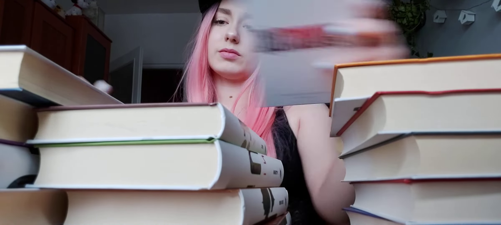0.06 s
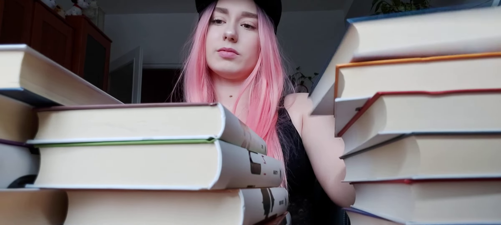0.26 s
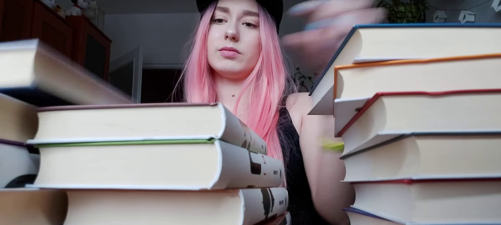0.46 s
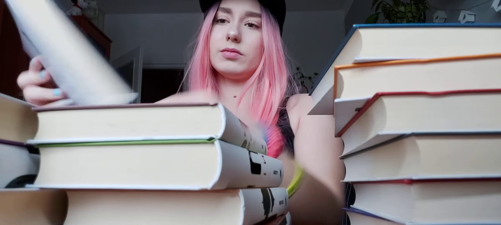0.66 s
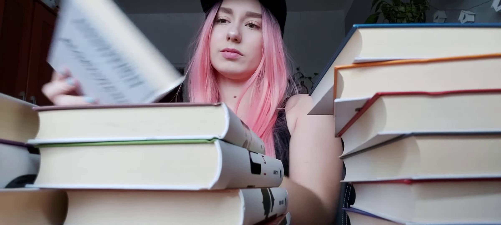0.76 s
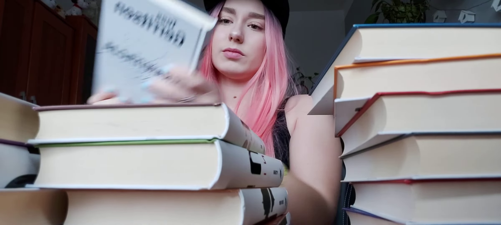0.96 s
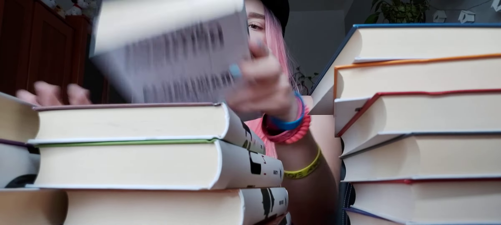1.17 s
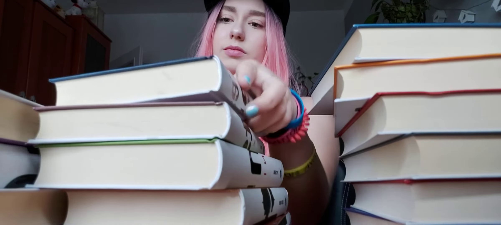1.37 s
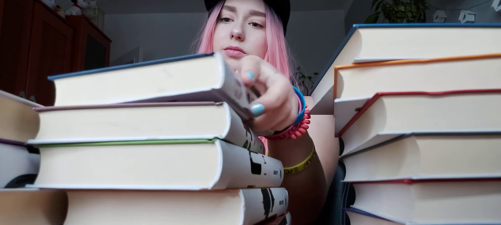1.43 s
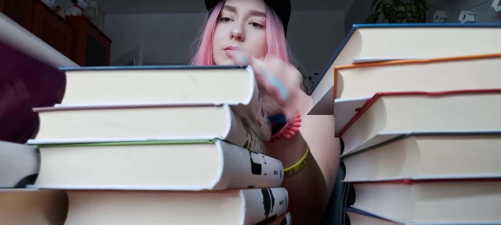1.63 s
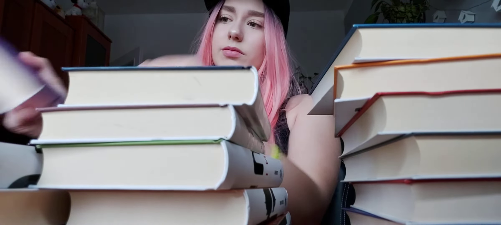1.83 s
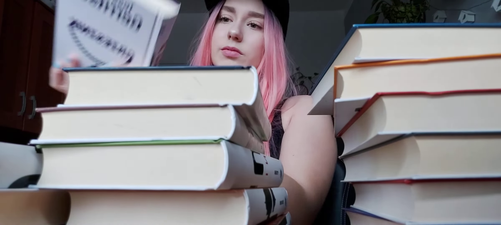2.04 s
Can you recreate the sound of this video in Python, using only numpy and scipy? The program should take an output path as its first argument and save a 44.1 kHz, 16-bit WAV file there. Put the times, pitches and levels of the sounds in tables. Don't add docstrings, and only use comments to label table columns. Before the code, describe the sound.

Hardcover books thump heavily onto a stack on a wooden table, with soft cover slides between

```python
import sys
import numpy as np
from scipy import signal
from scipy.io import wavfile

SR = 44100
rng = np.random.default_rng(int(sys.argv[2]) if len(sys.argv) > 2 else 0)


def boost_factor(decibels):
    exponent = np.asarray(decibels, float) / 20
    return 10 ** exponent


def master(y):
    cut = np.clip(np.atleast_2d(y).T, -1, 1)
    pcm = np.round(cut * 32767)
    wavfile.write(sys.argv[1], SR, pcm.astype(np.int16))


N = 92610


def rms_one(x):
    return x / np.sqrt(np.mean(x ** 2) + 1e-20)


def drift(rate_hz):
    r = np.exp(-80 * np.pi * rate_hz / SR)
    chance = rng.standard_normal(N // 40 + 2002)
    slow = signal.lfilter([1], [1, -2 * r, r * r], chance)[2000:]
    return np.interp(np.arange(N) / 40, np.arange(len(slow)), rms_one(slow))


def sides(pan_db):
    return boost_factor(np.array([pan_db, -np.asarray(pan_db)]) / 2)


def butter(x, order, hz, kind):
    return signal.sosfilt(signal.butter(order, hz, kind, fs=SR, output="sos"), x)


def strike(s, db, pan_db, modes, soft_hz, apart=0, scatter_db=4):
    out = 0
    at = (np.asarray(s) * SR).astype(int)
    luck = rng.standard_normal((len(at), len(modes), 2))
    for k, (hz, mode_db, t60) in enumerate(modes):
        clicks = np.full((2, N), 1e-18)
        gains = sides(pan_db + 0 * at) * boost_factor(db + mode_db + scatter_db * luck[:, k, 0])
        late = (apart * luck[:, k, 1] * SR / hz).astype(int)
        clicks[0, at] = gains[0]
        clicks[1, at + late] = gains[1]
        r = boost_factor(-60 / (t60 * SR))
        w = 2 * np.pi * hz / SR
        out = out + signal.lfilter([0, np.sin(w)], [1, -2 * r * np.cos(w), r * r], clicks)
    p = np.exp(-2 * np.pi * soft_hz / SR)
    return signal.lfilter([(1 - p) ** 2], [1, -2 * p, p * p], out)


def dying_noise(s, db, pan_db, t60, band_hz, alike):
    clicks = np.full((2, N), 1e-18)
    clicks[:, (s * SR).astype(int)] = sides(pan_db) * boost_factor(db)
    envelope = signal.lfilter([1], [1, -boost_factor(-60 / (t60 * SR))], clicks)
    shared, *own = rng.standard_normal((3, N))
    noise = alike * shared + np.sqrt(1 - alike ** 2) * np.array(own)
    return butter(envelope * noise, 1, band_hz, "band")


def coloured(spectrum, alike, patchy_db):
    out = 0
    white = rng.standard_normal((2, 2, N))
    hz, density_db = np.transpose(spectrum)
    bounds = np.geomspace(hz[0], hz[-1], int(2 * np.log2(hz[-1] / hz[0])) + 2)
    for k, (low, high) in enumerate(zip(bounds, bounds[1:])):
        mid, side = butter(white[k % 2], 2, [low, high], "band")
        band_db = np.interp(np.log(low * high) / 2, np.log(hz), density_db)
        stereo = np.sqrt(1 + alike) * mid + np.sqrt(1 - alike) * side * [[1], [-1]]
        out = out + boost_factor(band_db + patchy_db * drift(27)) * stereo
    return rms_one(out)


def stroke(start, length):
    u = (np.arange(N) / SR - start) / length
    return np.sin(np.pi / 2 * np.clip(np.minimum(u / 0.6, (1 - u) / 0.4), 0, 1))


def quiet_air():
    # f/Hz, density/dB
    air_spectrum = [(15, -47), (25, -1), (293, -9), (545, -25), (840, -12.5), (988, -22), (3520, -26.5),
                    (12500, -23.5), (16000, -18.5)]
    return boost_factor(-70.5) * coloured(air_spectrum, 0.082, 1.2)


def gliding():
    # t/s, length/s, level/dB, rasp level/dB, left-right/dB
    slides = [(-.04, 0.156, -66, -4, -1.5), (0.117, 0.071, -75, -11, -7), (0.221, 0.13, -59.5, 13.5, -5),
              (0.457, 0.22, -60.5, 0.5, 0), (0.491, 0.2, -73.5, -1, -0.5), (0.628, 0.11, -69, -14, 0),
              (1.338, .13, -65.5, 2, -3), (0.723, 0.19, -63, -91.5, -0.5), (0.928, 0.18, -65.5, -15, -0.5),
              (1.081, 0.094, -64.5, -7, -0.5), (1.177, 0.08, -70.5, -6.5, 0.5),
              (1.246, 0.13, -56, -0.5, -3), (1.419, 0.19, -49, -10.5, -5), (1.573, 0.22, -62, 3, -0.5),
              (1.796, 0.086, -71, -14, 2.5), (1.936, 0.145, -61.5, -23, 4.5)]
    # f/Hz, density/dB
    hiss_spectrum = [(2120, -32), (3600, -16.5), (4210, -9.5), (5330, 2.5), (10700, -7), (16000, 1.5)]
    # f/Hz, density/dB
    rasp_spectrum = [(880, -38), (1500, -11), (2870, -0.5), (4000, -9.5), (5200, -44), (8800, -120)]
    hiss = coloured(hiss_spectrum, 0.031, 1.5)
    rasp = coloured(rasp_spectrum, 0.031, 1.5)
    airy = butter(hiss, 2, 9700, "high")
    body = butter(hiss, 2, 9700, "low")
    out = 0
    for s, length, db, rasp_db, pan_db in slides:
        friction = airy - boost_factor(0.28 * (rasp_db - 1.5)) * body + boost_factor(rasp_db) * rasp
        out = out + sides(pan_db)[:, None] * stroke(s, length) * boost_factor(db) * friction
    return out


def handling():
    # t/s, length/s, level/dB
    shoves = [
        (0.196, 0.32, -30.5),
        (0.503, 0.23, -49),
        (0.706, 0.11, -52),
        (1.253, 0.19, -40),
        (1.417, 0.39, -45.5),
        (1.89, 0.17, -54.5),
        (0.922, 0.22, -67.5),
        (1.65, 0.21, -52),
    ]
    # f/Hz, density/dB
    rumble_spectrum = [(15, -28), (25, -16.5), (43, 11), (85, 0.5), (114, 3), (300, -8), (390, -55.5),
                       (660, -120)]
    push = sum(stroke(s, length) * boost_factor(db) for s, length, db in shoves)
    return coloured(rumble_spectrum, 0.85, 3.0) * push


def dragging():
    # t/s, length/s, level/dB
    drags = [
        (0.2, 0.11, -39),
        (0.585, 0.1, -45),
        (0.611, 0.15, -60),
        (1.916, 0.051, -69),
        (0.717, 0.2, -72.5),
        (1.224, 0.27, -56.5),
        (1.535, .1, -53),
        (1.607, 0.22, -51.5),
    ]
    # f/Hz, density/dB
    scuff_spectrum = [(120, -26.5), (200, 0), (894, -7), (1630, -24.5), (2270, -13), (3500, -31.5),
                      (4550, -61), (7700, -120)]
    grains = coloured(scuff_spectrum, 0.031, 1.5) * boost_factor(1.7 * drift(73))
    pull = sum(stroke(s, length) ** 2 * boost_factor(db) for s, length, db in drags)
    return grains * sides(-1.5)[:, None] * pull


def books():
    # t/s, cover snap level/dB, board slap level/dB, block knock level/dB, left-right/dB
    contacts = [(0.2026, -38, -37, -39, -4.5), (0.2063, -60, -45, -40.5, -10.5),
                (0.2266, -24, -23, -26.5, -12.5), (0.2361, -23, -24.5, -26.5, 0),
                (0.2811, -26.5, -27.5, -38, -4), (0.2916, -46.5, -40, -31.5, -3.5),
                (0.3413, -22.5, -30.5, -12, -8), (0.3483, -42, -36.5, -12, -6),
                (0.3534, -21, -22.5, -23, -2), (0.3712, -47.5, -32.5, -33.5, -8.5),
                (0.7528, -78, -62.5, -68, -12), (1.257, -40, -39, -53, 1.5), (1.2612, -64.5, -48.5, -37, 4),
                (1.2873, -20, -30.5, -23, -4), (1.2967, -46, -63, -36.5, 5), (1.3402, -29, -46, -40.5, -3),
                (1.6046, -39.5, -38.5, -35.5, -13), (1.6073, -28, -29, -16, -2),
                (1.616, -72.5, -54, -53, -11), (1.6388, -56, -60, -33.5, 3), (1.7701, -63.5, -57, -47.5, 0),
                (1.9151, -82, -79, -60.5, -4), (1.9337, -75, -84, -55, -6.5)]
    # f/Hz, level/dB, t60/s
    block_modes = [(192.4, -19, 0.16), (223.3, -20, 0.4), (277.4, -15.5, 0.29), (289.7, -6.5, 0.14),
                   (324.5, -37.5, 0.13), (381.7, -10, 0.15), (457, -24, .12), (458, -9.5, 0.043),
                   (517, -11, .1), (291, -5, 0.041), (431.6, 4, 0.013), (620, -28.5, 0.01),
                   (707, -21, 0.14), (724.5, -27, 0.12)]
    # f/Hz, level/dB, t60/s
    board_modes = [(667, 1, 0.023), (1004, 3, 0.012), (1006, -6, 0.014), (1400, -5, 0.014),
                   (1870, -5.5, 0.013), (2166, -3, 0.01), (3000, -4.5, 0.0055)]
    # f/Hz, level/dB, t60/s
    jacket_modes = [(3920, -7.5, 0.0021), (5700, -18, .006)]
    s, snap_db, board_db, knock_db, pan_db = np.transpose(contacts)
    knock = strike(s, knock_db, pan_db, block_modes, 1100, apart=0.016)
    boards = strike(s, board_db, pan_db, board_modes, 5200, apart=0.37)
    jacket = strike(s, snap_db, pan_db, jacket_modes, 6300, apart=0.19)
    snap = dying_noise(s, snap_db - 4.5, pan_db, 0.0088, [2500, 6860], 0)
    flutter = dying_noise(s, snap_db - 13, pan_db, 0.18, [900, 4000], 0)
    thud = dying_noise(s, knock_db - 11, pan_db, 0.51, [150, 450], .9)
    return knock + boards + jacket + snap + flutter + butter(thud, 2, 600, "low")


def room(x):
    t60, wall_cut_hz = 0.33, 15000
    x = butter(x, 2, 200, "high")
    out = np.zeros((2, N))
    dull = np.exp(-2 * np.pi * wall_cut_hz / SR)
    lags = (rng.uniform(.009, .035, size=16) * SR).astype(int)
    for k, lag in enumerate(lags):
        loop, state = x.copy(), [0.]
        gain = boost_factor(-60 * lag / SR / t60)
        for i in range(lag, N, lag):
            back, state = signal.lfilter([gain * (1 - dull)], [1, -dull], loop[i - lag:i], zi=state)
            loop[i:i + lag] += back[:N - i]
        out[k % 2] += (loop - x) * (-1) ** (k // 2)
    return out


def table():
    # t/s, sway level/dB, ring level/dB
    landings = [(0.212, -34, -31.5), (0.246, -16.5, -37.5), (0.257, -17, -27.5), (0.299, -19, -33.5),
                (0.3459, -10, -5.5), (0.3556, -10.5, -15), (0.76, -43, -47.5), (1.266, -29.5, -41.5),
                (1.279, -30, -30.5), (1.294, -25, -41.5), (1.346, -32, -25), (1.611, -31.5, -13),
                (1.6202, -14, -18), (1.927, -38.5, -43), (1.954, -39.5, -53)]
    # f/Hz, level/dB, t60/s
    frame_modes = [(53.7, -10, 0.53), (77.8, -9, 0.1), (88.6, 4.5, 0.061)]
    # f/Hz, level/dB, t60/s
    top_modes = [(117.5, 0, .37), (106, -13, .12), (130, -12, .14)]
    # from t/s, to t/s, level/dB, ease/s
    palms = [
        (.8, .93, -9, .04),
        (1.77, 1.915, -10, .05),
    ]
    s, sway_db, ring_db = np.transpose(landings)
    pan_db, push_hz = -3.5, 160
    sway = strike(s, sway_db, pan_db, frame_modes, push_hz, apart=.05, scatter_db=0)
    ring = strike(s, ring_db, pan_db, top_modes, push_hz, apart=.13, scatter_db=0)
    t = np.arange(N) / SR
    choke_db = 0
    for a, b, db, ease in palms:
        choke_db = choke_db + np.interp(t, [a, a + ease, b, b + ease / 4], [0, db, db, 0])
    return (sway + ring) * boost_factor(choke_db)


def cracks():
    # t/s, centre f/Hz, width/Hz, level/dB, left-right/dB
    crack_list = [(0.2264, 960, 607, -14, -7), (.229, 2240, 1210, -23.5, -6.5),
                  (0.2255, 3900, 2500, -30, -7.5), (0.226, 11300, 7000, -31, -5.5),
                  (.341, 12000, 3000, -29.5, -4.5), (.3412, 400, 348, -12, -7),
                  (0.3423, 1140, 604, -26.5, -1), (1.2552, 680, 396, -34.5, 0),
                  (1.2558, 11000, 6000, -45.5, 5), (1.2871, 750, 580, -22.5, -2.5),
                  (1.2874, 10800, 6000, -35, -4.5), (1.606, 430, 300.4, -18, -3),
                  (0.3421, 5130, 2000, -19.5, -8), (0.3516, 6900, 3000, -37.5, -3.5),
                  (.372, 3000, 2500, -33, -1.5), (0.3865, 5430, 2000, -45, -6.5),
                  (0.3955, 2770, 2500, -37, 6), (0.5744, 2630, 900, -46, -6), (0.6415, 2400, 1200, -41, -3),
                  (.752, 1960, 1300, -58, -10), (1.111, 1500, 1500, -67, -3.5),
                  (1.2872, 3860, 1500, -24.5, -1.5), (1.297, 3900, 1180, -36.5, 15),
                  (1.341, 10700, 8000, -32, -1), (1.43, 706, 600, -49, -6), (1.6075, 2000, 1000, -38, 2),
                  (1.768, 940, 764, -40, 4.5), (1.914, 700, 500, -72, 1), (1.938, 700, 600, -73, -5)]
    out = np.zeros((2, N + SR))
    count = 1500
    noise = rng.standard_normal((len(crack_list), 3, count))
    fade = boost_factor(-60 * np.arange(count) / SR / 0.0086)
    for (s, hz, width, db, pan_db), (shared, *own) in zip(crack_list, noise):
        alike = 1 - (1 - 0.71) * min(hz / 2500, 1)
        burst = fade * (alike * shared + np.sqrt(1 - alike ** 2) * np.array(own))
        r = np.exp(-np.pi * width / SR)
        poles = [1, -2 * r * np.cos(2 * np.pi * hz / SR), r * r]
        tone = signal.sosfilt([[0.9, 0.01, -0.951, *poles]] * 2, burst)
        at = int(s * SR)
        out[:, at:at + count] += sides(pan_db)[:, None] * boost_factor(db) * tone / np.abs(tone).max()
    return out[:, :N]


def far_stack():
    # t/s, level/dB
    nudges = [
        (0.9331, -50.5),
        (0.942, -45.5),
    ]
    # f/Hz, level/dB, t60/s
    hollow_modes = [(204, -12.5, 0.35), (258, -3.5, 0.35), (304.6, 4, 0.19), (323, -1, 0.26),
                    (357, -9, 0.2), (401, -8.5, 0.25), (480, -16, 0.32)]
    s, db = np.transpose(nudges)
    knocks = strike(s, db, -8.5, hollow_modes, 1200, apart=0.054, scatter_db=1)
    return butter(knocks, 2, 170, "high")


def skim():
    # t/s, length/s, level/dB, f/Hz, width/Hz
    fingertip = (1.93, .13, -71, 5004, 500)
    s, length, db, hz, width = fingertip
    whistle = butter(rng.standard_normal((2, N)), 2, [hz - width / 2, hz + width / 2], "band")
    return boost_factor(db) * stroke(s, length) * rms_one(whistle)


def scene():
    friction = gliding() + dragging() + skim()
    sharp = books() + far_stack()
    echoes = boost_factor(-18.5) * room(sharp.mean(axis=0))
    return quiet_air() + friction + handling() + sharp + echoes + table() + cracks()


def roll_off(x):
    return signal.sosfilt(signal.butter(12, 16820, fs=SR, output="sos"), x)


def record(dry):
    x = butter(dry, 4, 55, "high")
    x = 2.5 * np.tanh(x / 2.5)
    x = signal.sosfilt(signal.ellip(6, .5, 24, 15900, fs=SR, output="sos"), x)
    x = signal.sosfilt(signal.ellip(10, .5, 70, 16750, fs=SR, output="sos"), x)
    return roll_off(x)


dry = scene()
out = record(dry)
master(out)
```